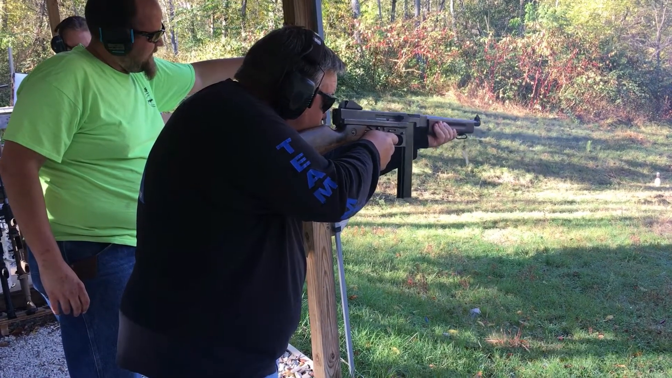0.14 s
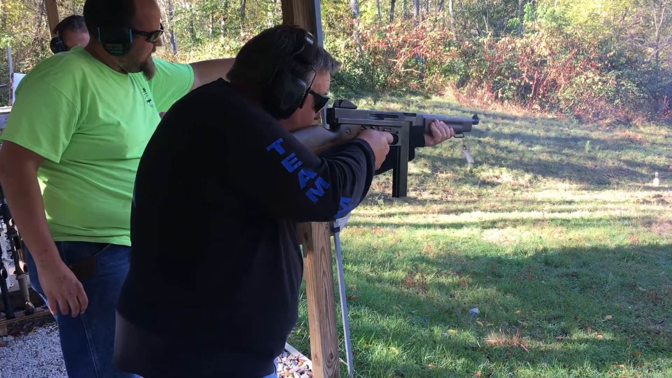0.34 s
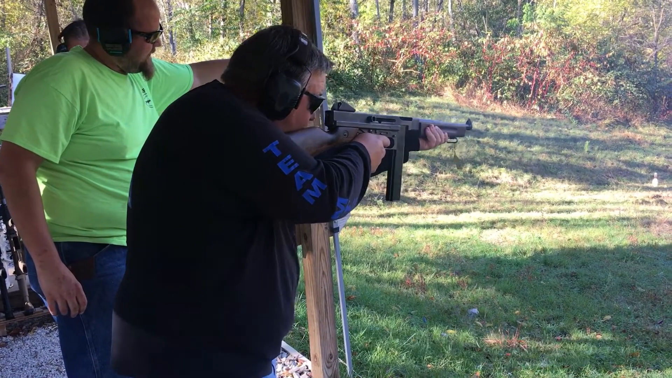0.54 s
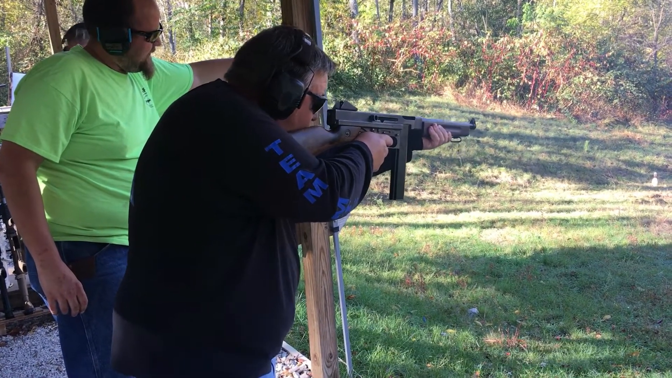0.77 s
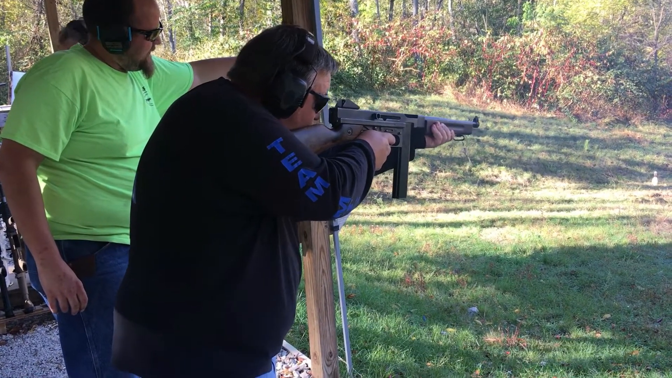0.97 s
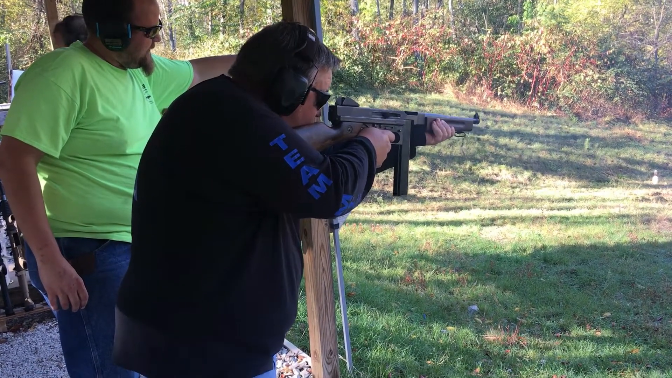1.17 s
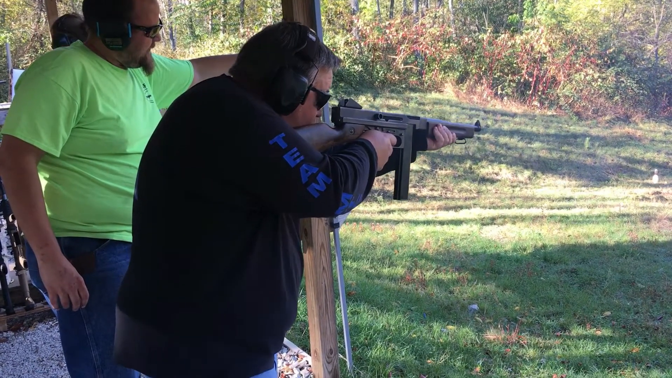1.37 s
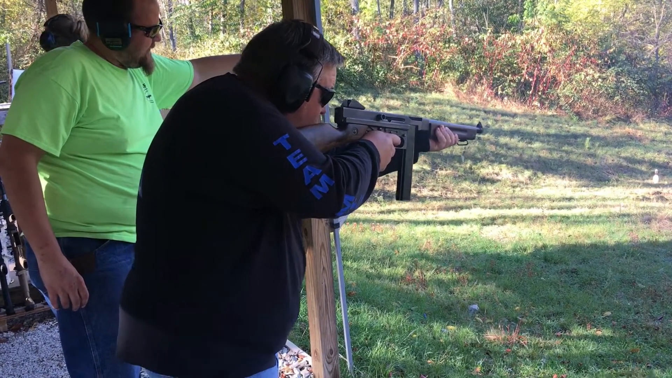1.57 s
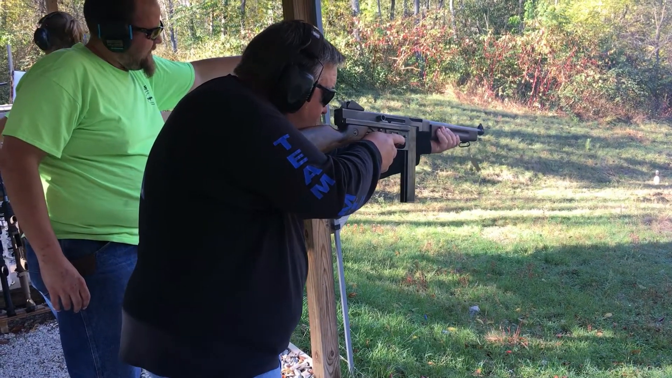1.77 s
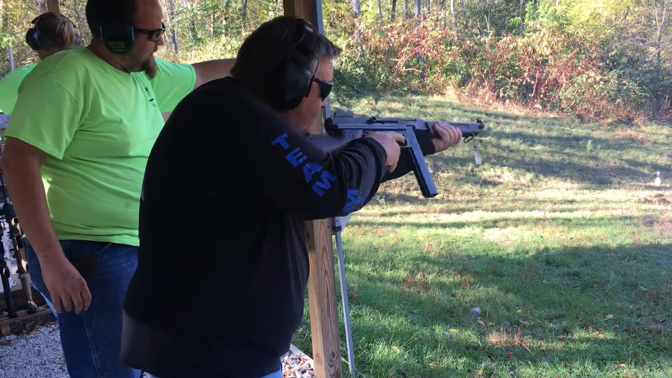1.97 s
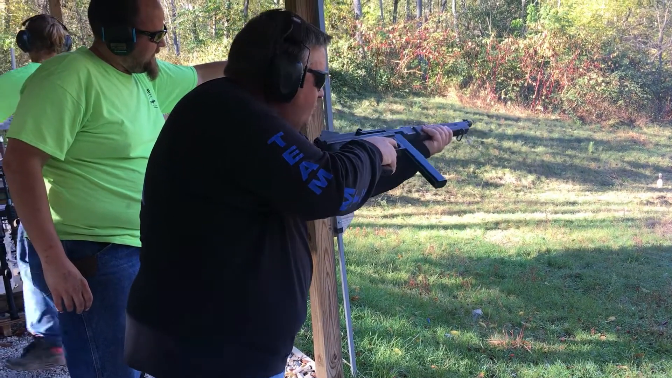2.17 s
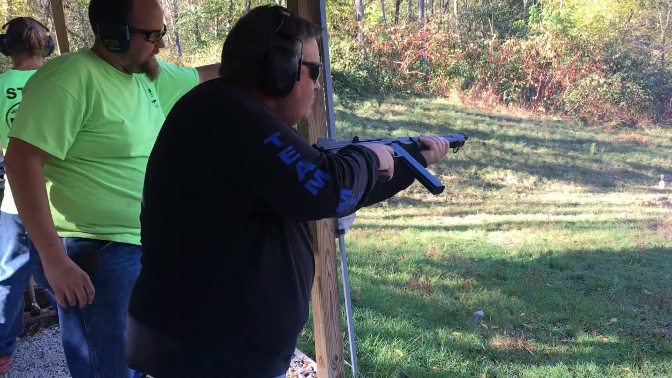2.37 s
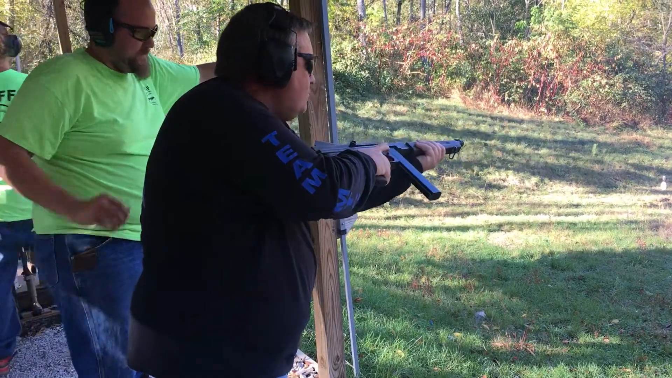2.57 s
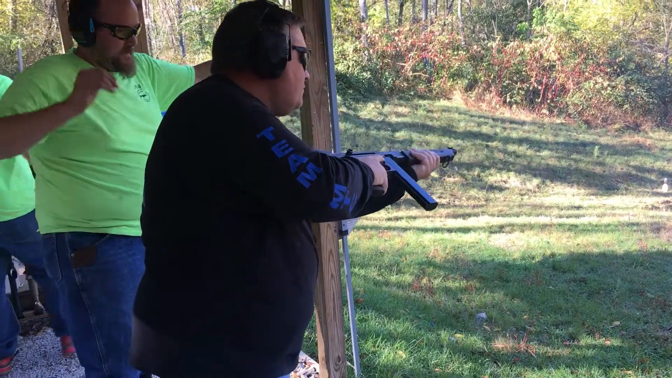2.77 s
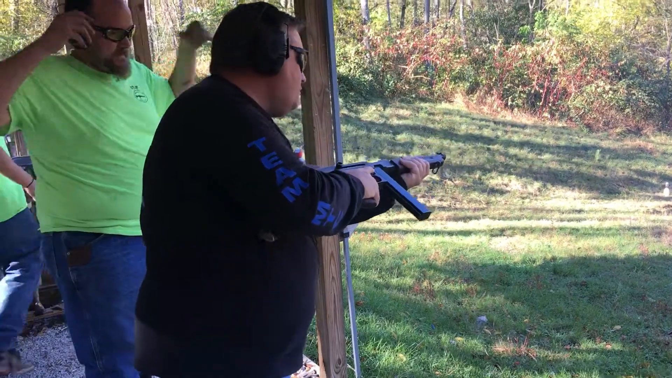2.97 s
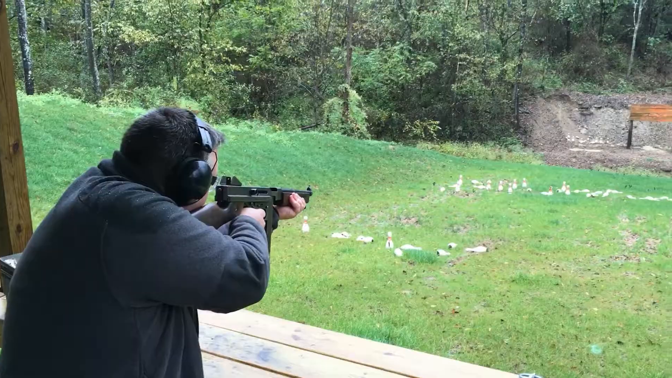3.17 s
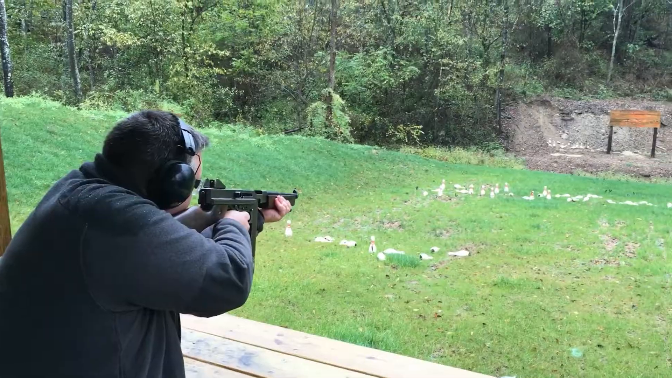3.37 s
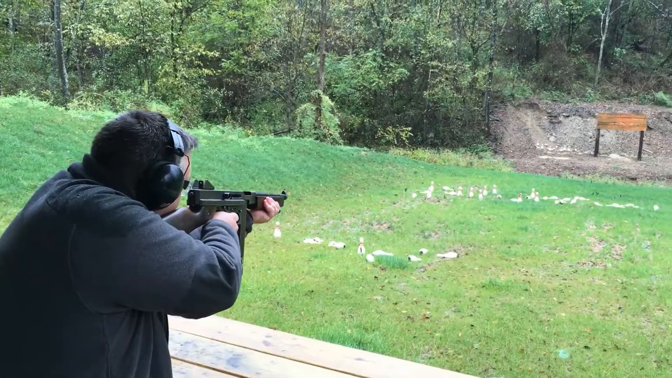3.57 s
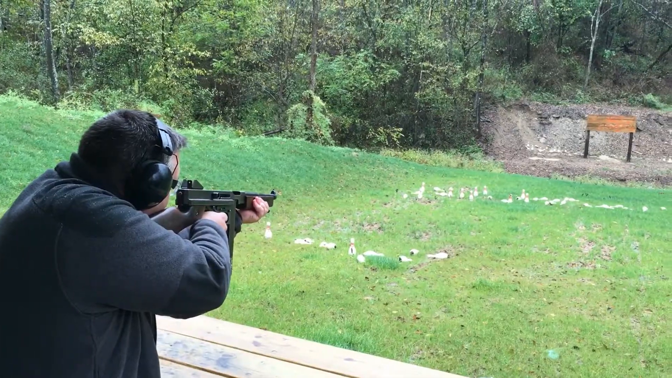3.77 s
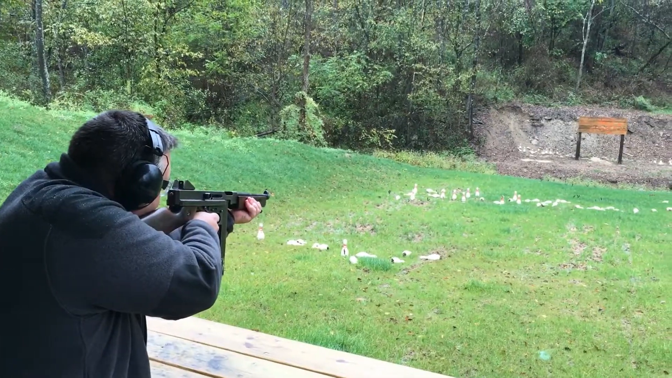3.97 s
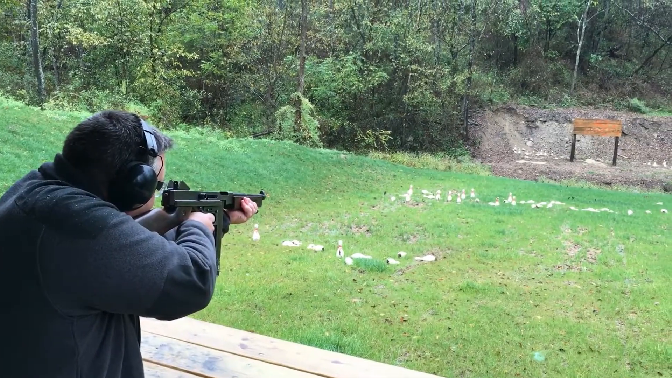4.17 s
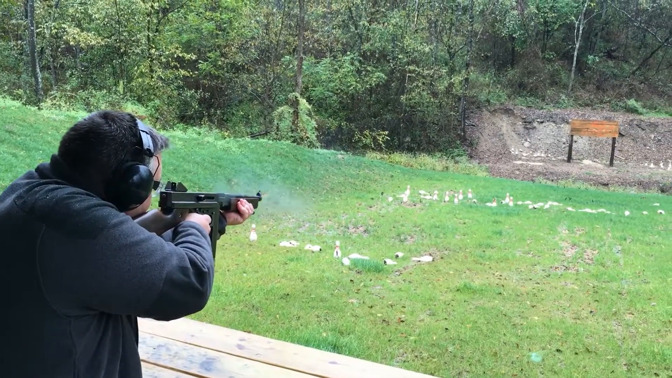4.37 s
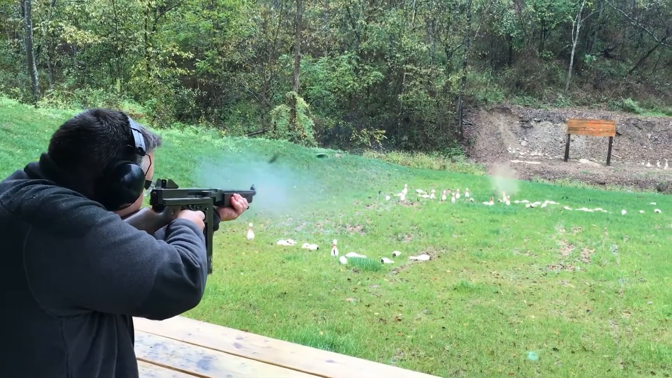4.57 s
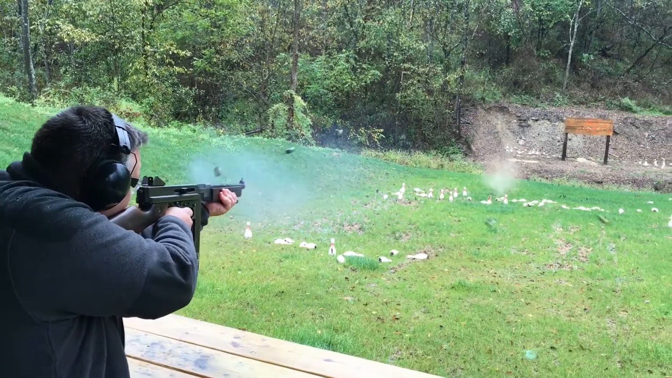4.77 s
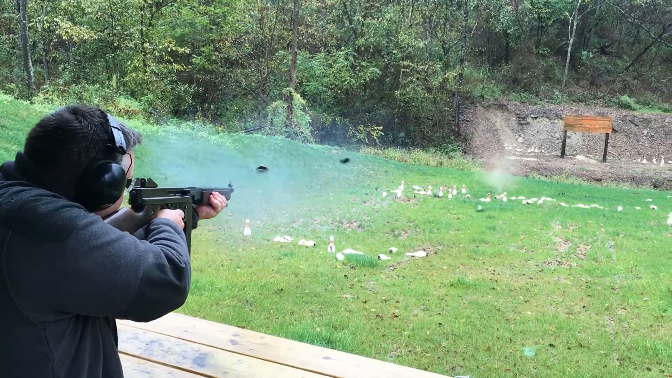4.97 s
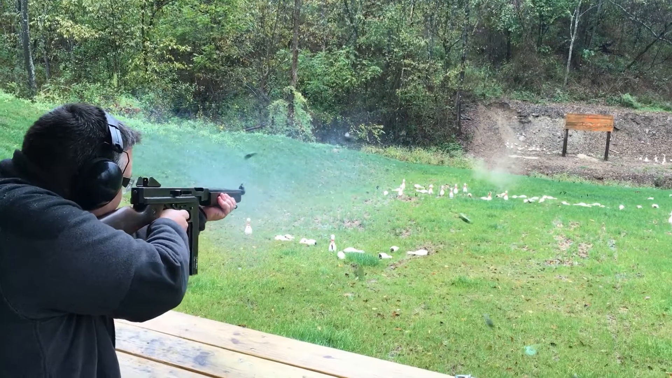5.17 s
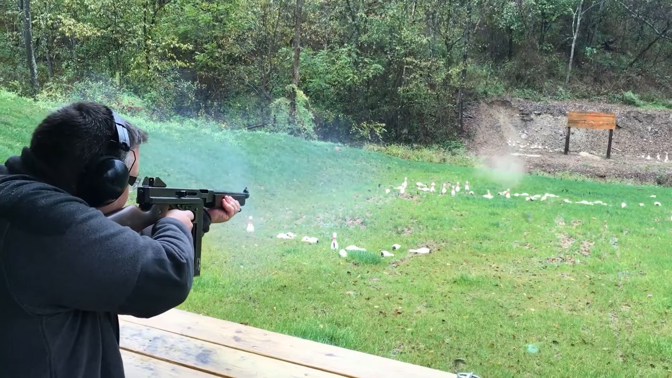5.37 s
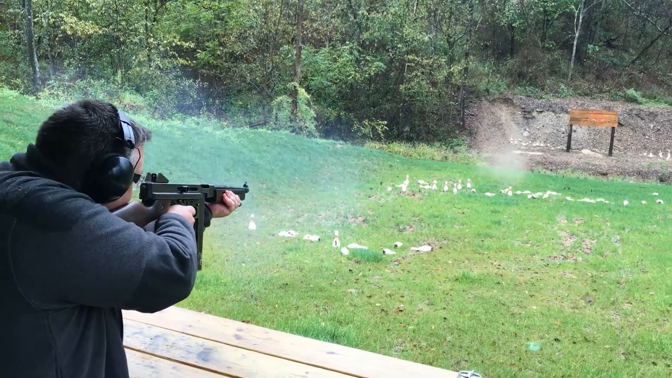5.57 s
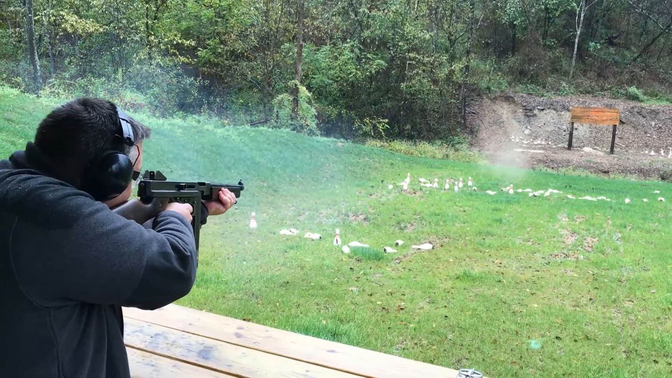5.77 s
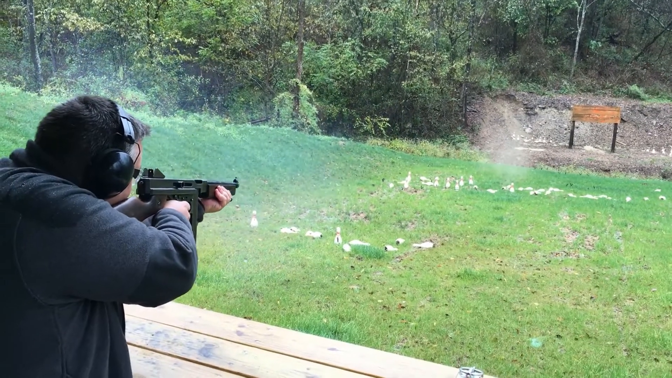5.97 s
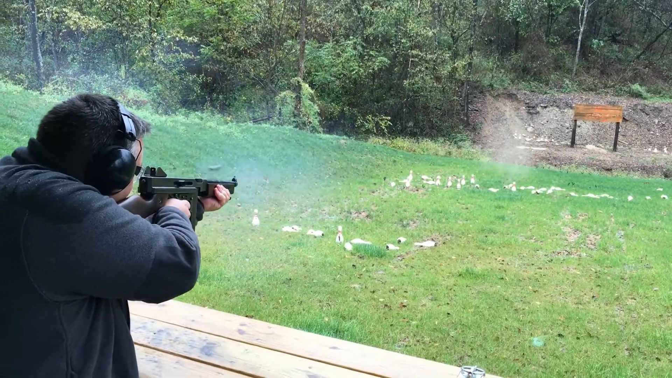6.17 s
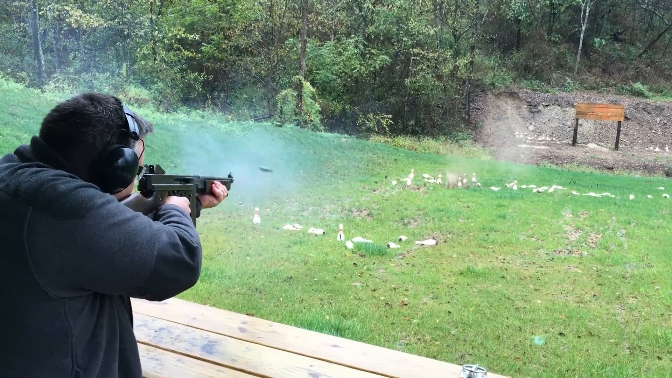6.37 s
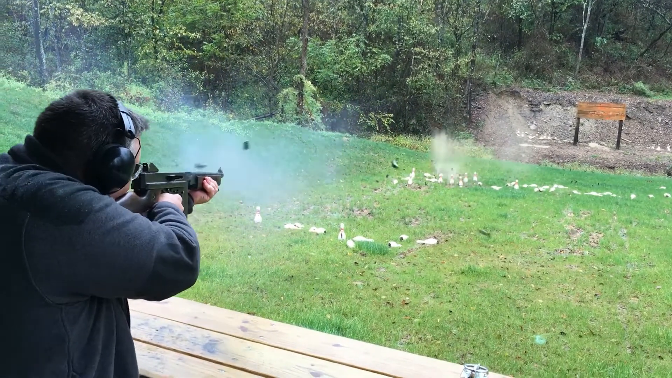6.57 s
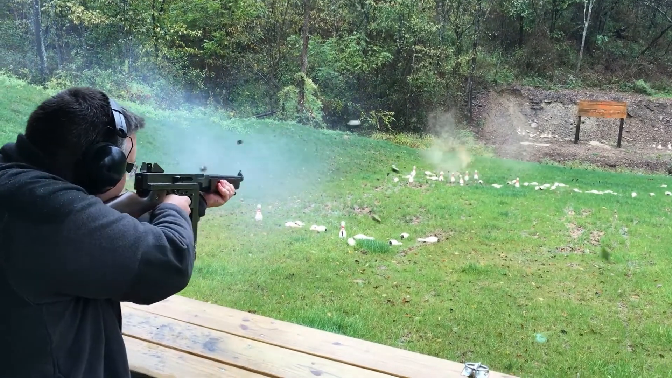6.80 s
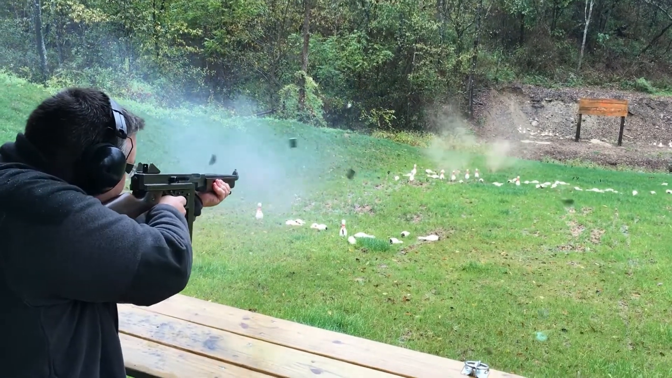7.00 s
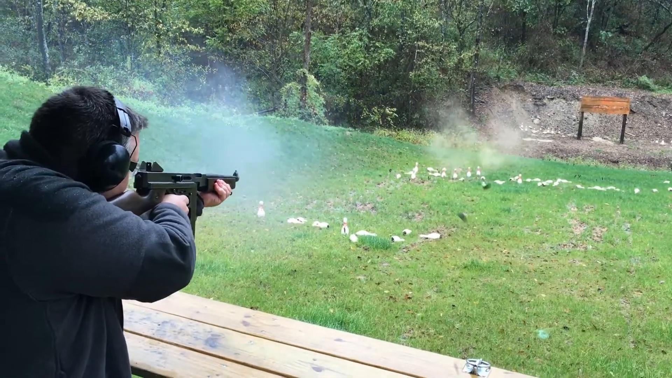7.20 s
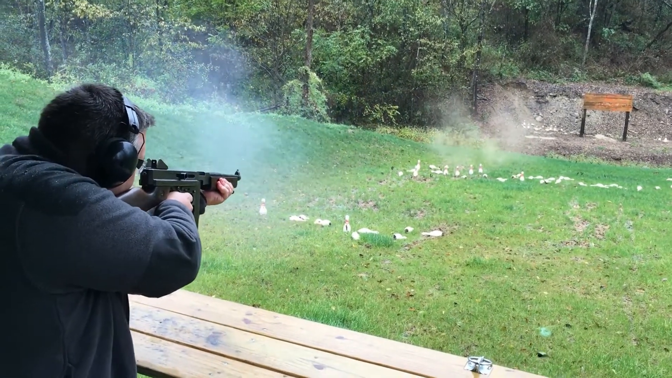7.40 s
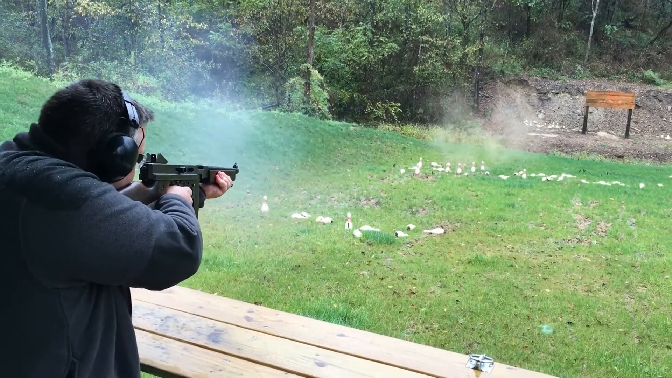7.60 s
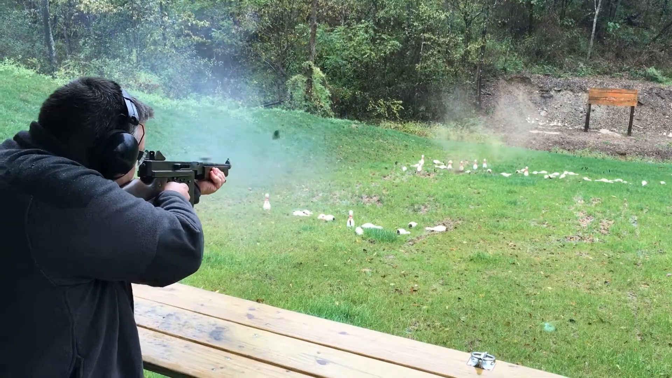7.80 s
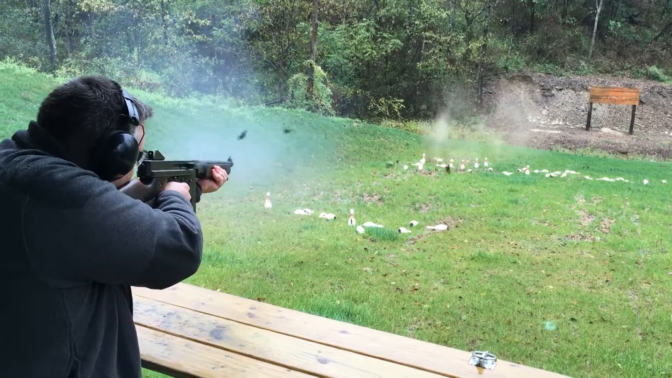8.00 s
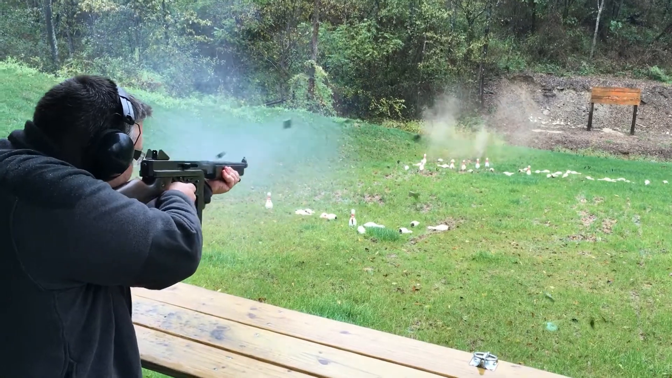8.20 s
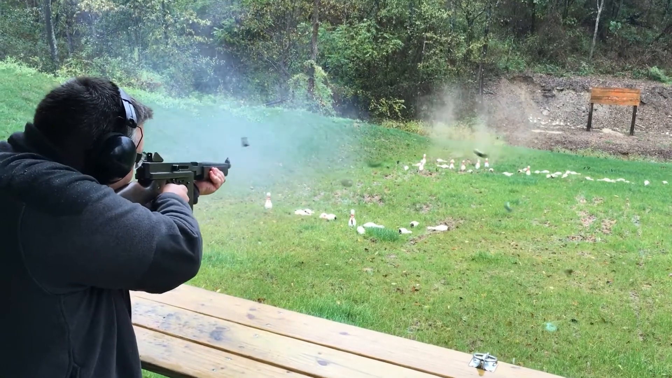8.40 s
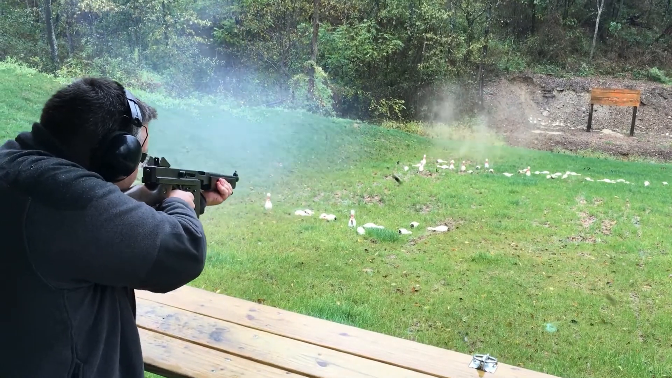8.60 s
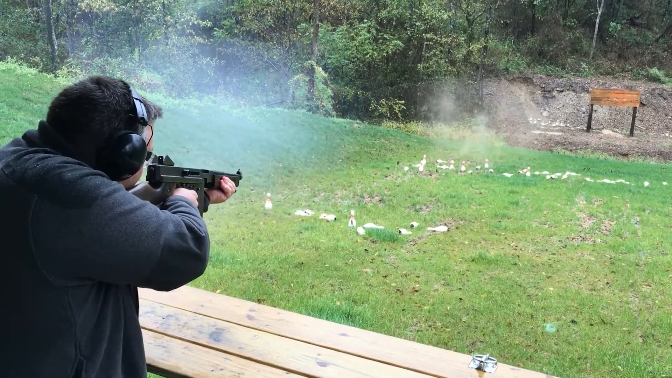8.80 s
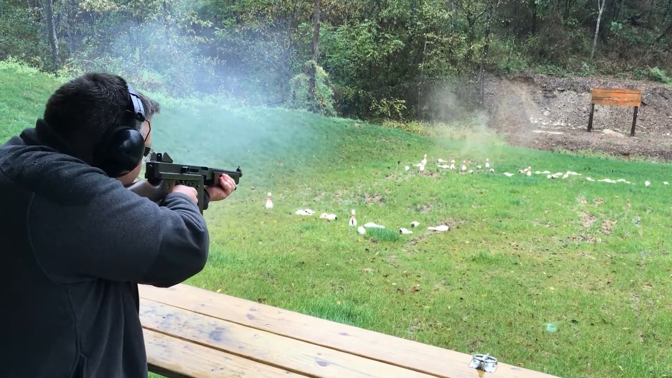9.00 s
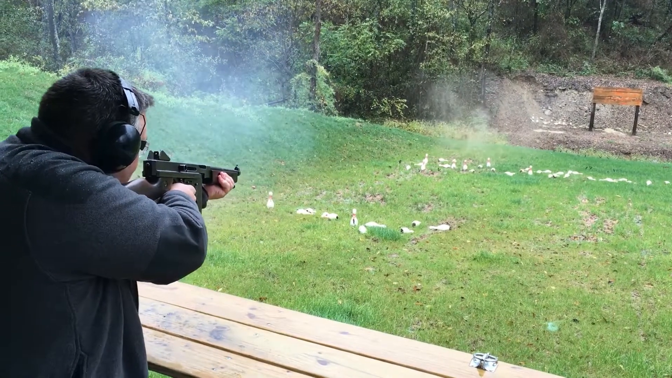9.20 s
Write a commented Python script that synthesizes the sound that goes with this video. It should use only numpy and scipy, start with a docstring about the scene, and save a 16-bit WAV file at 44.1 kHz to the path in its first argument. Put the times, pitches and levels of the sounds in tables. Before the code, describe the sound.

A submachine gun opens almost at once with a loud, close burst of five rapid shots, followed by two more at about 1.2 seconds. The blasts ring under a range shelter, slightly overload the microphone and echo from the woods, while spent brass cases tinkle on the floor. Near 2.1 seconds the bolt snaps shut on an empty chamber with a metallic ring. At 3.2 seconds the background changes abruptly to another shelter, with light wind rumble and soft knocks and scuffs of gun handling until about 4 seconds. Three longer, fuller bursts of around ten shots each follow, from 4.4 to 5.2, 6.2 to 7.1 and 7.8 to 8.4 seconds. A bolt clack leads straight into each one, and a strong echo rolls back from the wooded slope. The last echo fades with a couple of faint case tinkles around 9 seconds.

```python
"""A submachine gun fires two short bursts under one range shelter, then three long bursts under another.
Every blast rings the same roof and posts, overloads the microphone and rolls back from the wooded slope.
The bolt clacks before each burst, spent cases tinkle on the floor, and light wind rumbles."""
import sys
import numpy as np
from scipy import signal
from scipy.fft import rfft, irfft
from scipy.io import wavfile
from scipy.ndimage import uniform_filter1d

SR = 44100
rng = np.random.default_rng(int(sys.argv[2]) if len(sys.argv) > 2 else 0)


def store_pcm(level_fs):
    """Save levels as 16-bit WAV."""
    pcm = np.round(np.clip(level_fs, -1, 1) * 32767).astype(np.int16)
    wavfile.write(sys.argv[1], SR, np.atleast_2d(pcm).T)


N = 407917

# shots: (s, level dB)
SHOTS = [(.151, -0.4), (0.2266, -.5), (.299, -3.5), (0.3764, -1.5), (.451, -0.5), (1.2042, -1), (1.278, -0.6),
         (4.4135, -4), (4.4925, -2.5), (4.5681, -3.3), (4.6453, -1.5), (4.719, -1), (4.8, 0.1), (4.8821, -1), (4.9603, -0.6), (5.053, 0), (5.1591, 0.5),
         (6.2097, 0.2), (6.289, -0.3), (6.3677, -0.6), (6.444, -0.4), (6.519, 0.7), (6.6127, 1.5), (6.693, 1.2), (6.7724, 1), (6.8538, 1), (6.9336, 1.3), (7.0418, 0),
         (7.7771, -0.1), (7.8522, 0.6), (7.9298, 0.9), (8.0074, .2), (8.086, 1), (8.1626, 0), (8.2414, 0.3), (8.3173, 1), (8.3907, .4)]
# change from the first shelter to the second (s)
MOVE_S = 3.197  # fixed
# blast colour at each shelter: (Hz, dB)
BLAST_A = [(25, -17), (60, -7.5), (110, -11.5), (170, -9.5), (300, -16.5), (550, -20.5), (800, -20), (1300, -17), (2400, -7), (4500, -13.5), (8000, -17.5), (12000, -22), (15500, -26)]  # fixed
BLAST_B = [(25, -10), (60, -2.5), (110, -3.5), (160, -9.5), (300, -3), (550, 1.5), (800, -10.5), (1300, -6),
           (2400, -2.3), (4500, -6), (8000, -12.5), (12000, -14), (15500, -21.5)]
# peaks and notches of each shelter's reflections: (Hz, width Hz, dB)
SHELTER_A = [(275, 23, -1.5), (341, 19, 6.5), (420, 18, -8), (470, 16, 12.5), (652, 200, 16), (912, 86, 9.5),
             (1025, 54, 10.5), (1150, 64, 10), (1310, 170, 8.5), (1422, 24, 11), (1820, 280, 7),
             (2300, 21, 9), (2580, 35, 9), (3290, 95, 6.5)]
SHELTER_B = [(177, 16, 3.5), (233.6, 39, 8), (272.5, 10, 4.5), (370.6, 83, 12), (385.7, 11.6, -20), (488, 17, -1),
             (510, 93, -3.5), (554, 12.4, 10.5), (606.8, 10.5, 13), (632, 64, -1.5), (754, 8, 13), (846, 40, -3.5),
             (924, 115, 12.5), (940, 19, -3), (1116, 56, 9), (1078, 5.8, 7.5), (1165, 55, 5), (1390, 16, 11),
             (1464, 8.5, 15.5), (1616, 3.5, 12.5), (1800, 1900, 5), (2440, 7.2, 14), (4902, 310, -8),
             (10540, 240, -18.5)]
# course of a blast by band: (Hz, rise s, hold s, t60 s)
COURSE_A = [(70, .008, .02, .06), (280, .002, .012, .11), (700, .001, .02, .17), (2000, .0004, .02, .105), (5000, .0002, .02, .11), (11000, .0002, .027, .095)]  # fixed
COURSE_B = [(69, 0.014, 0.0185, 0.079), (283, 0.0072, 0.0325, 0.087), (686, 0.0084, 0.016, 0.2), (2020, 0.0033, 0.027, 0.14), (5000, 0.00067, 0.024, 0.18), (11400, 0.00017, 0.024, 0.17)]
# echo of the woods, its colour: (Hz, dB)
WOODS_A = [(71, -59), (120, -23), (188, -31), (250, -7.5), (407, -3.5), (917, -5), (1320, -14), (2240, -12),
           (2980, -19.5), (3580, -15.5), (3970, -20.5), (9510, -31), (15500, -44)]
WOODS_B = [(59, -50), (100, -25), (126, -21), (204, -18.5), (285, -3.5), (383, -2.5), (462, -9), (607, -2.5), (1240, -12.5),
           (1880, -10.5), (4840, -23.5), (5840, -24.5), (15000, -41)]
# knocks and scuffs of handling: (s, level dB, t60 s, centre Hz)
HANDLING = [(2.305, -43, .15, 5000), (2.627, -39.5, 0.16, 3020), (3.245, -25, 0.91, 850), (3.29, -33, 0.26, 290), (3.315, -24.5, 0.42, 2030),
            (3.452, -27, 0.13, 2450), (3.559, -30.5, .36, 2270), (3.934, -31, .3, 1570)]
# spent cases landing close by: (s, level dB, strongest partial Hz)
CASES = [(.0075, -26, 15700), (.009, -30.5, 9730), (.936, -44, 7130), (1.056, -39.5, 10090), (1.171, -29, 14800), (2.395, -50, 13200), (2.418, -45.5, 11100),
         (2.84, -47.5, 12000), (5.98, -50, 10050), (8.9512, -45, 10090), (9.0359, -38.5, 15580)]
# ring of a brass case: (Hz, dB, t60 s)
BRASS = [(7150, -4, .14), (7530, -5, .14), (9750, -5, .12), (10050, -3, .14), (10900, -7, .14), (12850, -3, .15), (15120, -4, .14), (15450, -7, .11)]  # fixed
# the bolt closing on an empty chamber and rebounding: (s, level dB)
DRY_FIRE = [(2.0644, -37), (2.091, -23.5), (2.16, -42), (2.215, -42)]
STEEL = [(7170, -10, 0.2), (7537, -22, 0.45), (8230, -6, 0.1), (8296, -19, .22), (10040, -18, 0.59), (11000, -20, 0.39), (11120, -20, .2), (11700, -15, 0.44), (12800, -14, 0.18), (13990, -28, .3), (14990, -5, .25), (15630, -28, .22)]  # (Hz, dB, t60 s)
# open air at each place: (Hz, dB)
AIR_A = [(24, -28), (40, -6), (119, -5.5), (239, -23.5), (401, -14), (443, -52), (1110, -17), (2920, -34.5), (6140, -35.5),
         (7310, -32), (15000, -48)]
AIR_B = [(21, -35), (35, -2), (69, -17.5), (247, -9.5), (352, -10), (389, -22), (465, -18), (1190, -10.5), (2670, -21.5),
         (3450, -28), (15000, -52)]
# level of the open air and of wind on the microphone: (s, air dB, wind dB)
BREEZE = [(0, -59, -64.5), (1.9, -73.5, -70), (2.4, -44.5, -51), (3.15, -49, -59), (3.3, -38.5, -46), (4.3, -41, -40.5), (4.802, -42, -70), (6.1, -67, -56.5), (9.25, -59, -61.5)]
TOP_HZ = 15850  # fixed
TIME = np.arange(N) / SR
# distinct slaps from berm and tree line: (delay s, extra dB)
SLAPS_A = [(0.145, 7.5), (.27, -5.5)]
SLAPS_B = [(0.148, 19), (0.246, 9.8), (0.297, 5), (0.426, 5)]
# shots fired just before the start, of which only the echo is left: (s)
EARLIER = [(-0.59,), (-.54,)]
# the first blast of a burst rings longer, the following ones are clipped short (s)
FIRST_LONGER_S, NEXT_SHORTER_S = 0.0061, 0.001
# spread from round to round: length (s), bark near 2.3 kHz (dB), thump (dB)
SPREAD_S, BARK_SPREAD_DB, THUMP_SPREAD_DB = .0015, 0.5, 1.7
# a gap longer than this starts a new burst (s)
PAUSE_S = .3  # fixed
# echoes of one shot from the near ground, the tree line and the far slope: (delay s, level dB, rise s, hold s, t60 s)
ECHOES_A = [(0, -3.5, .03, 0.14, 0.94), (0.218, -6, 0.017, .11, 0.59), (0.424, -14.5, 0.19, 0.44, 11.6)]
ECHOES_B = [(0, 1, 0.023, 0.023, 0.97), (.222, 4, 0.033, 0.12, 2.53), (.6, -5.5, .5, .85, 1.6)]
# trigger pulls, each freeing the open bolt: (s, level dB, rattle Hz, closing Hz)
TRIGGERS = [(.105, 4, 3660, 550), (1.171, -1, 4400, 900), (4.373, 10, 2270, 1830), (6.1647, -2.5, 2350, 2260), (7.7332, -8, 2400, 2313)]
# the bolt leaves the sear, strips a round, and closes with a clack and a thud: (share of its run to the shot, level dB, rise s, t60 s)
BOLT_RUN = [(0, -28.5, 0.00056, .14), (.53, -22, .004, .13), (.85, -14, 0.0015, 0.056), (0.66, -27, 0.0081, 0.32)]
# softer contacts start more slowly: rise time as a share of the t60
RISE_SHARE = 0.018
# the other cases fly off, and some land on something hard farther away
FLIGHT_S, FLIGHT_SPREAD_S, HARD_SHARE = 0.78, 0.097, 0.6
THUD_HZ = 211
FAR_CASE_DB, FAR_CASE_SPREAD_DB = -56, 3
FAR_CASE_HZ, FAR_CASE_DETUNE, FAR_CASE_T60_S = 10020, 0.016, .11


def undb(db):
    """Decibels to gain."""
    return 10 ** (np.asarray(db) / 20)


def unit(x):
    """Scale to rms 1."""
    return x / np.sqrt(np.mean(x ** 2))


def add(out, s, x):
    """Mix x into out from time s."""
    i = int(s * SR)
    x, i = x[max(-i, 0):], max(i, 0)
    out[i:i + len(x)] += x[:len(out) - i]


def colour(x, points, peaks=(), size=8192):
    """Causal filter from (Hz, dB) points plus (Hz, width, dB) peaks."""
    f = np.maximum(np.arange(size // 2 + 1) * SR / size, 1)
    hz, db = np.transpose(points)
    cepstrum = irfft(np.log(undb(np.interp(np.log(f), np.log(hz), db) + bells(f, peaks))))
    cepstrum[1:size // 2] *= 2
    cepstrum[size // 2 + 1:] = 0
    return signal.fftconvolve(x, irfft(np.exp(rfft(cepstrum))))[:len(x)]


def bands(x, centres):
    """Split x into overlapping bands that sum to x."""
    f = np.maximum(np.arange(len(x) // 2 + 1) * SR / len(x), 1)
    spectrum = rfft(x)
    return np.array([irfft(spectrum * np.interp(np.log(f), np.log(centres), w), len(x)) for w in np.eye(len(centres))])


def swell(t, rise, hold, t60):
    """Rise, hold, then die away."""
    return np.minimum(t / max(rise, 1e-5), 1) * undb(-60 * np.maximum(t - hold, 0) / t60)


def reflections(course, t, comb):
    """A dense pattern of reflections whose lows follow the shelter's comb; its treble comb is left to chance."""
    centres = [row[0] for row in course]
    grip = np.interp(np.fft.rfftfreq(len(t), 1 / SR), [1600, 2600], [1, 0])  # fixed
    noise = irfft(rfft(rng.standard_normal(len(t))) * comb)
    for _ in range(6):
        cluster = np.sum(bands(noise, centres) * envelopes(course, t), axis=0)
        excess = uniform_filter1d(abs(rfft(cluster)) ** 2, size=5) / uniform_filter1d(comb ** 2, size=5) / len(t)
        noise = irfft(rfft(noise) / np.sqrt(excess) ** grip)
    return noise


def blasts(shots, course, tone, shelter, level_db, fresh_hz, fresh_share, crack, size=8192):
    """The shelter answers every shot alike in the lows; the turbulent gas makes the treble new each time."""
    t = np.arange(size) / SR
    f = np.arange(size // 2 + 1) * SR / size
    centres = [row[0] for row in course]
    comb = undb(bells(f, shelter))
    fresh = np.clip(fresh_share + f ** 2 / (f ** 2 + fresh_hz ** 2), 0, 1)
    same = rfft(reflections(course, t, comb)) * np.sqrt(1 - fresh)
    direct = 1 + crack * np.exp(-t / 0.002)  # the direct crack stands ahead of the reflections
    out = np.zeros(N)
    for s, db, longer, bark_db, thump_db in shots:
        noise = irfft(same + rfft(rng.standard_normal(size)) * comb * np.sqrt(fresh))
        shot = direct * np.sum(bands(noise, centres) * envelopes(course, t, longer), axis=0)
        shot = colour(shot, tone, [(2300, 3000, bark_db), (70, 170, thump_db)])
        # the level is that of the first, loudest part of the blast
        add(out, s, undb(db + level_db) * shot / np.std(shot[:SR // 45]))
    return out


def woods(shots, echoes, slaps, tone, level_db, damping_db, patchy_db, steady):
    """Trunks and slope scatter each shot back in clumps; longer paths lose more treble."""
    t = np.arange(2 * SR) / SR
    roll = np.sqrt(sum((undb(db) * swell(np.maximum(t - delay, 0), rise, hold, t60)) ** 2 for delay, db, rise, hold, t60 in echoes))
    centres = np.array([300, 1000, 3000, 9000])  # fixed
    clumps = unit(uniform_filter1d(rng.standard_normal(len(t)), size=400))
    course = patchy_db * clumps + sum(d * np.exp(-((t - lag) / 0.0055) ** 2) for lag, d in slaps)
    shapes = roll * undb(course - damping_db * t * np.sqrt(centres[:, None] / 1000))
    trunks = rng.standard_normal(len(t))
    out = np.zeros(N)
    for start, *_ in shots:
        # fixed trunks repeat their pattern, moving air and leaves blur it
        scatter = steady * trunks + rng.standard_normal(len(t))
        add(out, start, np.sum(bands(scatter, centres) * shapes, axis=0))
    return undb(level_db) * unit(colour(out, tone))


def clacks(table, low_db, high_db, peak_db=7):
    """Short rattling contacts, each with one resonance on a broad body."""
    t = np.arange(SR // 2) / SR
    out = np.zeros(N)
    for s, db, rise, t60, hz in table:
        slopes = [(hz / 10, low_db), (hz / 2, -3), (hz, 0), (hz * 10, high_db)]
        body = unit(colour(rng.standard_normal(len(t)), slopes, [(hz, 0.082 * hz, peak_db)]))
        add(out, s, undb(db) * body * swell(t, rise, rise, t60))
    return out


def ping(modes, tick_db, tick_t60, detune=0.0025):
    """Struck metal: a bright tick and freely ringing partials."""
    t = np.arange(SR // 2) / SR
    ring = sum(undb(db) * np.sin(2 * np.pi * hz * (1 + detune * rng.standard_normal()) * t) * undb(-60 * t / t60) for hz, db, t60 in modes)
    tick = unit(colour(rng.standard_normal(len(t)), [(800, -14), (4000, -13.5), (9000, -6), (15000, -5)]))
    return ring / np.std(ring[:SR // 100]) + undb(tick_db) * tick * undb(-60 * t / tick_t60)


def metal(others_db=-11, scatter_db=3, ring_t60=0.21):
    """Cases land, each contact favouring one partial; the bolt rings on the empty gun."""
    out = np.zeros(N)
    for s, db, strongest_hz in CASES:
        others = [(hz, d + others_db + scatter_db * rng.standard_normal(), t60) for hz, d, t60 in BRASS]
        add(out, s, undb(db) * ping([(strongest_hz, 0, ring_t60)] + others, tick_db=7, tick_t60=0.022, detune=0.0034))
    for s, db, hz in far_cases():
        add(out, s, undb(db) * ping([(hz, 0, FAR_CASE_T60_S)], tick_db=3, tick_t60=.012))
    for s, db in DRY_FIRE:
        add(out, s, undb(db) * ping(STEEL, tick_db=2.5, tick_t60=0.11))
    return out


def outdoors(first):
    """Rustling air that wavers slightly, and gusts rumbling on the microphone."""
    s, air_db, wind_db = np.transpose(BREEZE)
    waver = unit(uniform_filter1d(uniform_filter1d(rng.standard_normal(N), size=3000), size=3000))
    air = np.where(first, unit(colour(rng.standard_normal(N), AIR_A)), unit(colour(rng.standard_normal(N), AIR_B)))
    wind = unit(colour(rng.standard_normal(N), [(20, -23.0), (60, 14.5), (110, 0), (250, -23), (1000, -36.5)]))
    return air * undb(np.interp(TIME, s, air_db) + 0.23 * waver) + wind * undb(np.interp(TIME, s, wind_db) + 2.8 * waver)


def envelopes(course, t, longer=0):
    """The course of each band of a blast, all with equal energy."""
    return np.array([unit(swell(t, rise, hold + longer, t60)) for _, rise, hold, t60 in course])


def bells(f, peaks):
    """Level in dB of (Hz, width, dB) peaks at the frequencies f."""
    return sum(db / (1 + (2 * (f - hz) / width) ** 2) for hz, width, db in peaks)


def rounds(shots, dull_db, boom_db, count=3):
    """Rows (s, dB, extra length s, bark dB, thump dB): every round differs a little, and the opening few sound duller and boomier."""
    s, db = np.transpose(shots)
    length, bark, thump = rng.standard_normal((len(s), 3)).T
    leads = np.diff(s, prepend=-np.inf) > PAUSE_S
    opening = np.arange(len(s)) < count
    longer = np.where(leads, FIRST_LONGER_S, -NEXT_SHORTER_S) + SPREAD_S * length
    return np.column_stack([s, db, longer, dull_db * opening + BARK_SPREAD_DB * bark, boom_db * opening + THUMP_SPREAD_DB * thump])


def bolt():
    """The bolt runs forward from each trigger pull to the first shot, clacking louder as it goes."""
    contacts = []
    for s, db, rattle_hz, closing_hz in TRIGGERS:
        run = min(shot for shot, _ in SHOTS if shot > s) - s
        for (share, contact_db, rise, t60), hz in zip(BOLT_RUN, (rattle_hz, rattle_hz, closing_hz, THUD_HZ)):
            contacts.append((s + share * run, db + contact_db, rise, t60, hz))
    return clacks(contacts, low_db=-11, high_db=-23.5)


def handling():
    """Knocks and scuffs as the gun is lowered, shifted and shouldered."""
    return clacks([(s, db, RISE_SHARE * t60, t60, hz) for s, db, t60, hz in HANDLING], low_db=-11.0, high_db=-25.5, peak_db=3.5)


def far_cases():
    """Rows (s, dB, Hz) of the ejected cases that tinkle faintly after their flight."""
    chance = rng.standard_normal((len(SHOTS), 3))
    hard = rng.random(len(SHOTS)) < HARD_SHARE
    return [(s + FLIGHT_S + FLIGHT_SPREAD_S * late, FAR_CASE_DB + FAR_CASE_SPREAD_DB * loud, FAR_CASE_HZ * (1 + FAR_CASE_DETUNE * sharp))
            for (s, _), (late, loud, sharp), heard in zip(SHOTS, chance, hard) if heard]


def ducking(blast, depth_db, threshold_db=-28, release_s=0.035):
    """Gain on the echo: it is held down while the blasts are loud and swells back after the last one."""
    keep = np.exp(-1 / (release_s * SR))
    load = abs(signal.lfilter([1 - keep], [1, -keep], blast ** 2))
    return undb(-depth_db * load / (load + undb(threshold_db) ** 2))


def scene():
    """One shelter after the other, with a brief fade to silence between them."""
    first = TIME < MOVE_S
    early = [row for row in SHOTS if row[0] < MOVE_S]
    late = [row for row in SHOTS if row[0] > MOVE_S]
    a = blasts(rounds(early, dull_db=-2.0, boom_db=7.5), COURSE_A, BLAST_A, SHELTER_A, level_db=-9.0, fresh_hz=6000, fresh_share=0.23, crack=0.47)
    a += ducking(a, depth_db=10.5) * woods(EARLIER + early, ECHOES_A, SLAPS_A, WOODS_A, level_db=-35, damping_db=7.5, patchy_db=2.0, steady=1.0)
    b = blasts(rounds(late, dull_db=-8.0, boom_db=4.0), COURSE_B, BLAST_B, SHELTER_B, level_db=-9.0, fresh_hz=5500, fresh_share=0.24, crack=1.0)
    b += ducking(b, depth_db=4.0) * woods(late, ECHOES_B, SLAPS_B, WOODS_B, level_db=-29.0, damping_db=9.5, patchy_db=1.0, steady=0.98)
    fade = np.clip((abs(TIME - MOVE_S) - .006) / .026, .01, 1)
    return np.tile(fade * (a * first + b + outdoors(first) + bolt() + handling() + metal()), (2, 1))


def record(dry):
    """The mono microphone rounds off the peaks of the blasts; the top is cut."""
    rounded = dry / (1 + dry ** 4) ** .25  # fixed
    return signal.sosfilt(signal.ellip(10, .2, 70, TOP_HZ, fs=SR, output="sos"), rounded)


dry = scene()
out = record(dry)
store_pcm(out)
```